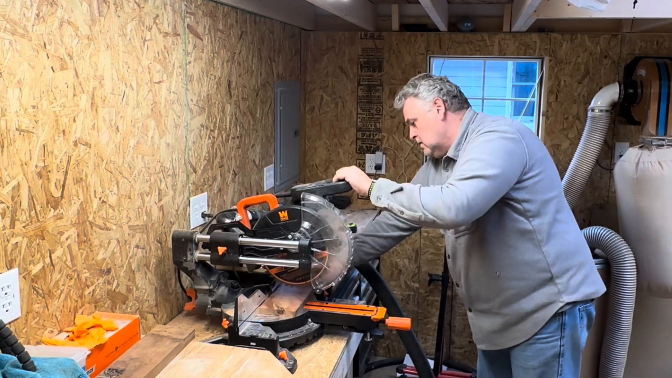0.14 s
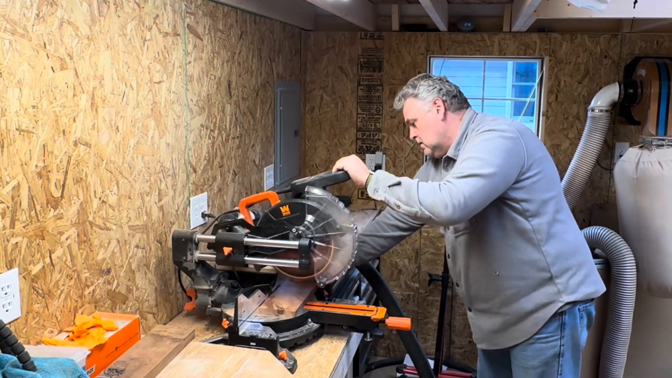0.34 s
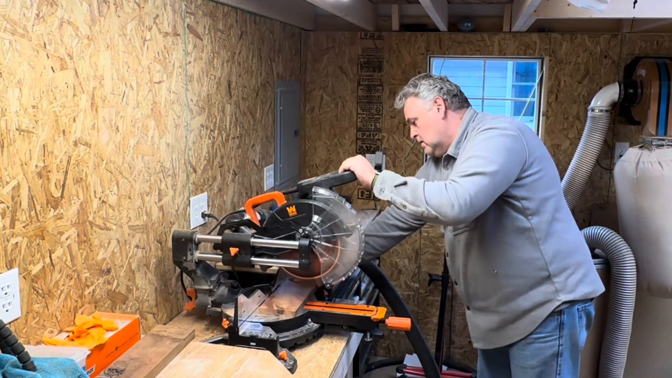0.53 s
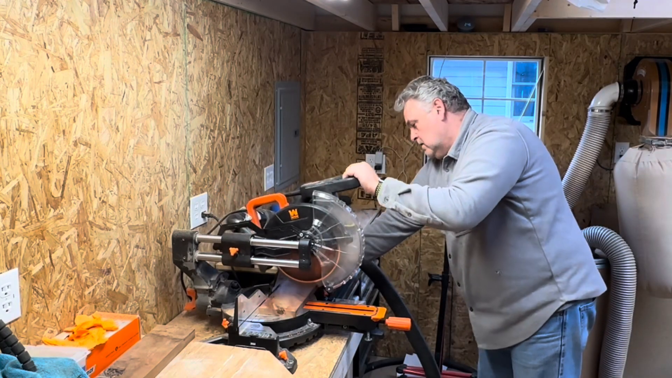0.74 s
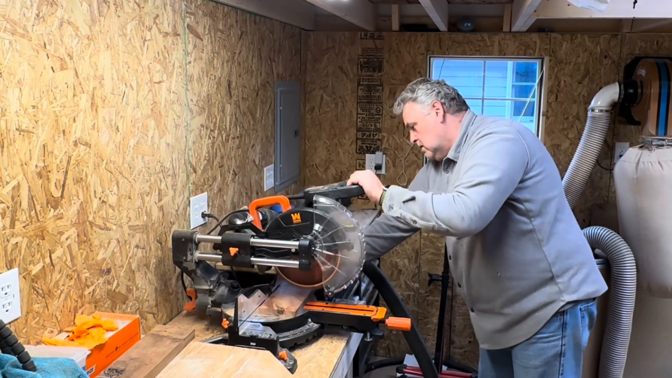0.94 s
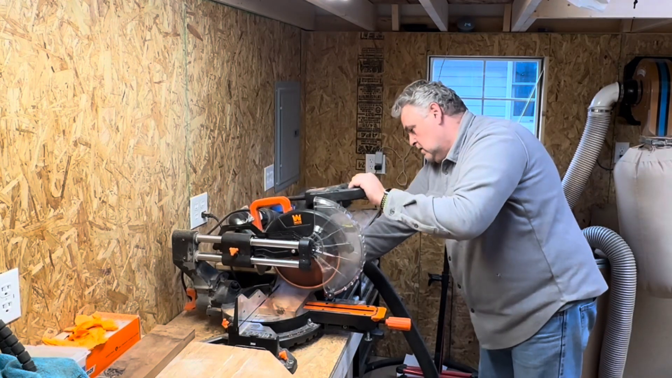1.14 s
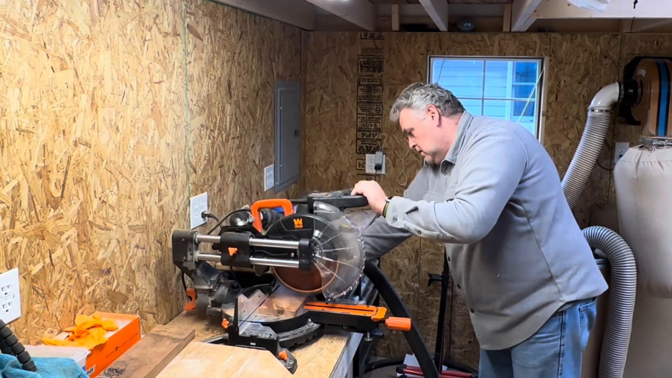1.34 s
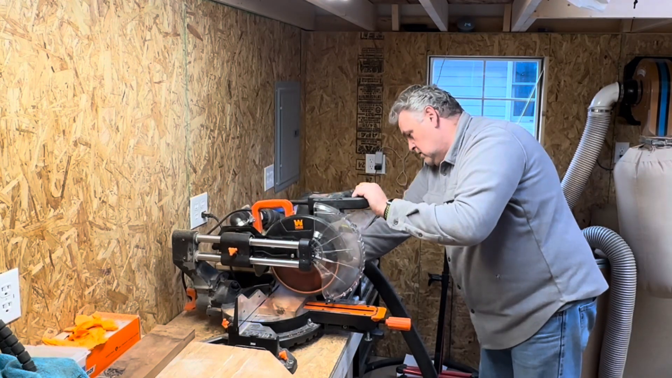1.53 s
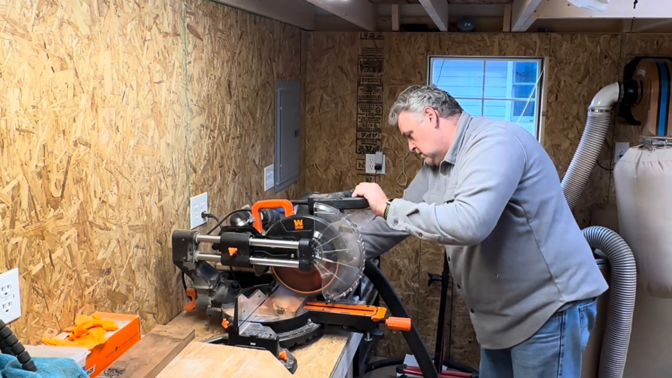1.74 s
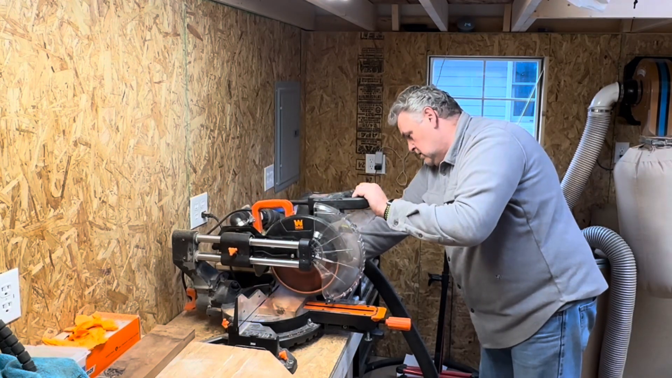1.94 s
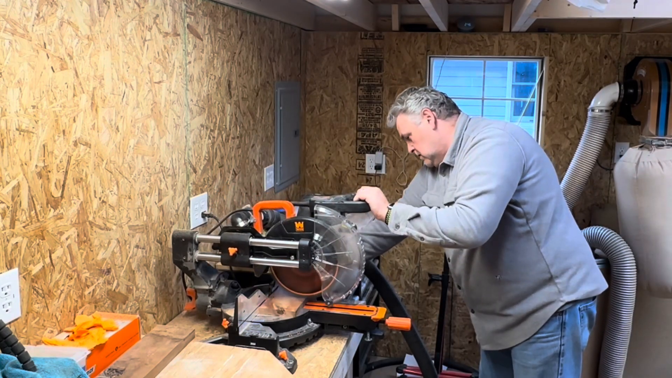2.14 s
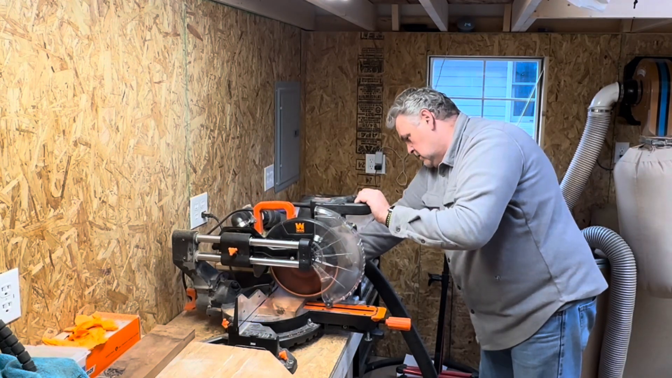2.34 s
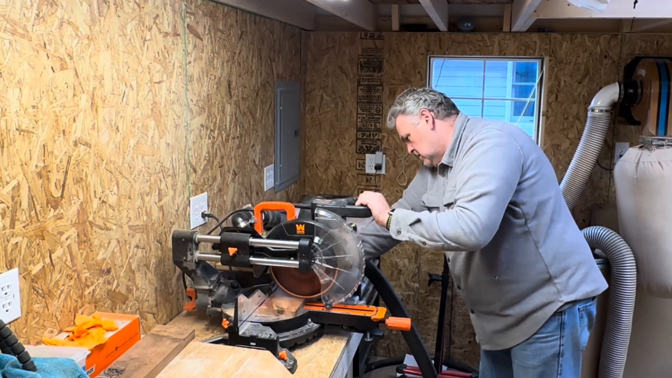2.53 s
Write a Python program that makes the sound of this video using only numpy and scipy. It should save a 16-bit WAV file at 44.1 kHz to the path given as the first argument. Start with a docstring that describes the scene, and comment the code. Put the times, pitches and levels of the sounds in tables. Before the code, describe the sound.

A miter saw in a small wooden workshop: switch tick, brief gearbox shudder, fast rising whine and harsh loud roar of cutting, then the roar drops and the blade rings while coasting; close, slightly overloaded microphone.

```python
"""In a small wooden workshop a miter saw starts: the switch clicks, the gearbox shudders, the motor climbs to speed.
Gear teeth and armature slots whine as sines at multiples of the shaft speed, over a roar of air, brushes
and cut wood made of noise shaped in bands. Then the roar falls away and the blade rings, as noise-driven
resonances, while the saw coasts. Mains hum swells at the start, and low hum and hiss fill the room.
The input overloads softly at the loudest moments."""
import sys
import numpy as np
from scipy import signal
from scipy.io import wavfile
from scipy.ndimage import uniform_filter1d

SR = 44100
rng = np.random.default_rng(int(sys.argv[2]) if len(sys.argv) > 2 else 0)


def bounce(signal):
    """Save signal as a 16-bit WAV file at the path given by the first command-line argument."""
    frames = np.transpose(np.atleast_2d(signal))
    limited = np.clip(frames, -1, 1)
    pcm = np.round(limited * 32767).astype(np.int16)
    wavfile.write(sys.argv[1], SR, pcm)


N = 116865
T = np.arange(N) / SR


def amp(db):
    """Decibel law: level in dB to amplitude gain."""
    return 10 ** (np.asarray(db) / 20)


def evened(x):
    """Normalization: scales a signal to rms 1."""
    return x / np.sqrt(np.mean(x ** 2) + 1e-20)


def follow(points):
    """Linear interpolation of (time, value) points over the whole scene."""
    return np.interp(T, *np.transpose(points))


def read_spectrum(points, hz):
    """Interpolation of a spectrum along a log-frequency axis."""
    point_hz, value = np.transpose(points)
    return np.interp(np.log(hz + 1), np.log(point_hz + 1), value)


def drift(smooth_s):
    """Low-pass filtered randomness: white noise averaged twice wanders slowly, at rms 1."""
    size = max(int(smooth_s * SR), 2)
    once = uniform_filter1d(rng.standard_normal(N), size)
    return evened(uniform_filter1d(once, size))


def resonate(x, hz, width_hz):
    """Two-pole resonance, of gain 1 at its peak."""
    return signal.lfilter(*signal.iirpeak(hz, hz / max(width_hz, 1), SR), x)


def ring(hz, width_hz):
    """Random excitation of a mode: noise through the same resonance twice, at rms 1."""
    once = resonate(rng.standard_normal(N), hz, width_hz)
    return evened(resonate(once, hz, width_hz))


def noise(shape_db, patchy_db):
    """Spectral shaping: random short-time spectra follow shape_db(hz, t), with drifting patches."""
    frames, hz = N // 256 + 5, np.fft.rfftfreq(1024, 1 / SR)
    real, imaginary, patches = rng.standard_normal((frames, 513, 3)).T
    for axis in (0, 1):
        patches = uniform_filter1d(patches, size=10, axis=axis)
    frame_s = np.arange(frames) * 256 / SR
    gain = amp(shape_db(hz, frame_s) + patchy_db * evened(patches))
    return signal.istft((real + 1j * imaginary) * gain, nperseg=1024, noverlap=768)[1][:N]


WAVER_DB, HALO_S = 2.2, .002  # rms level waver; smoothing time of the halo noise


def tone(phase, rough):
    """Random modulation: a wavering sine crossfades into a narrow halo of noise as rough goes 0 to 1."""
    rough = np.clip(rough, 0, 1)
    halo = drift(HALO_S) * np.sin(phase) + drift(HALO_S) * np.cos(phase)
    sine = np.sqrt(2) * amp(WAVER_DB * drift(0.007)) * np.sin(phase)
    return (1 - rough) * sine + rough * halo


# Shaft speed. Columns: time_s, speed_turns_per_s
SPEED = [(.195, 60), (.25, 135), (.29, 165), (.344, 195), (.4, 227), (.46, 254), (.558, 286), (.63, 302),
         (.708, 315), (.788, 326), (.884, 335.3), (.96, 341), (1.158, 352), (1.3, 361), (1.6, 373.3),
         (1.87, 381), (2.1, 384.6), (2.2, 383.3), (2.31, 381.6), (2.41, 378.3), (2.53, 373.3), (2.65, 369)]
# Whine levels. Columns: time_s, gear_db, slot_db, slot_octave_db
WHINE = [(.24, -50, -35, -60), (0.291, -55, -11, -48), (.325, -30, -23, -42), (.35, -19.5, -52, -43),
         (.4, -14, -16.5, -34), (.46, -11, -26, -20), (.52, -19, -20, -17.5), (.58, -15.5, -32, -38),
         (.7, -7, -16, -36), (.77, -13.5, -15, -19), (.884, -17.5, -19, -20), (.96, -20, -17, -18),
         (1.05, -34, -27, -26), (1.158, -17, -24, -20.5), (1.3, -39, -22, -22), (1.4, -25, -36, -35),
         (1.6, -26.5, -23.5, -33), (1.87, -38, -16.5, -29), (2.08, -48, -24, -29),
         (2.15, -42.5, -26.5, -57), (2.41, -38.5, -28, -60), (2.65, -61, -47, -60)]
# The slot whine clears as speed settles. Columns: time_s, roughness (0-1)
SLOT_ROUGH = [(.5, .8), (.75, .3), (1.6, .15)]
GEAR, SLOTS = 7, 12  # tones per shaft turn
WOBBLE, GEAR_ROUGH = .001, .2  # rms fraction of speed; roughness 0-1
START_S, WHINE_RISE_S = .195, 0.026


def whine():
    """Rotational orders: gear teeth and armature slots sound at multiples of the shaft speed."""
    s, gear_db, slot_db, octave_db = np.transpose(WHINE)
    turns = follow(SPEED)
    phase = 2 * np.pi * np.cumsum(turns * (1 + WOBBLE * drift(0.007))) / SR
    slot_rough = follow(SLOT_ROUGH)
    voices = [(GEAR, gear_db, GEAR_ROUGH), (SLOTS, slot_db, slot_rough), (2 * SLOTS, octave_db, slot_rough)]
    strong = sum(amp(np.interp(T, s, db)) * tone(order * phase, rough) for order, db, rough in voices)
    return (strong + weak_whines(turns, phase)) * np.clip((T - START_S) / WHINE_RISE_S, 0, 1) ** 2


# Multiples of the shaft speed that sound only weakly. Columns: order
WEAK_ORDERS = [3, 6, 14, 19, 21, 28]
# One voice per weak order, level before load and casing gain. Columns: level_db, roughness (0-1)
WEAK_VOICES = [(-25, 0.1), (-24, 0.23), (-23, 0.64), (-21.5, 0.8), (-21, 0.72), (-26, 1)]
# Resonances of the casing. Columns: pitch_hz, width_hz, gain_db
CASING = [(1170, 160, -12), (2110, 770, -3), (4280, 700, 10), (5800, 500, 3.5), (8200, 2100, -5)]


def weak_whines(turns, phase):
    """Resonant amplification: weak shaft orders are heard where they cross casing resonances."""
    roar_s, *roar_levels = np.transpose(ROAR)
    load_db = np.interp(T, roar_s, roar_levels[3] + 15)  # follows the mid band of the roar
    out = np.zeros(N)
    for order, (level_db, rough) in zip(WEAK_ORDERS, WEAK_VOICES):
        casing_gain = sum(amp(gain_db) / (1 + (2 * (order * turns - hz) / width_hz) ** 2)
                          for hz, width_hz, gain_db in CASING)
        level = amp(level_db + load_db + 2.36 * drift(0.12))
        out += casing_gain * level * tone(order * phase, rough)
    return out


# Roar level in each band, before the trim.
# Columns: time_s, bass_db, low_db, low_mid_db, mid_db, high_mid_db, treble_db
ROAR = [(.19, -50, -42, -36, -39.5, -37.5, -37), (.235, -46, -36, -33, -29.5, -33.5, -36),
        (.27, -46, -33, -27, -27.5, -24.5, -31), (.3, -49, -30, -28, -22.5, -19.5, -27),
        (.33, -44, -27, -26, -18, -21, -25), (.41, -46, -27, -24, -17, -16, -19),
        (.55, -45, -22, -24, -15, -13, -16), (.66, -40, -26, -27, -16, -13.5, -16),
        (.71, -29.5, -28, -25, -15.5, -13.5, -16), (.76, -40, -26, -26, -15, -13, -15),
        (.88, -36, -22, -26, -15.5, -11.5, -13), (1.08, -38.5, -23, -25, -16.5, -11, -13),
        (1.31, -39.5, -26, -25, -13.5, -10.5, -13), (1.56, -43, -28, -25, -16.5, -11, -13),
        (1.65, -47, -28, -27, -20, -14.5, -14), (1.76, -46, -34, -29, -22, -15.5, -14),
        (1.9, -47, -35, -37, -27, -17, -15), (2.05, -56, -38, -39, -28, -20, -19),
        (2.13, -43, -39, -41, -30, -21, -22), (2.18, -46, -40, -43, -38, -25, -24),
        (2.32, -52, -40, -43, -30, -28.5, -27), (2.38, -51, -38, -43, -36, -28.5, -30),
        (2.5, -55, -39, -44, -33, -31.5, -31), (2.65, -53, -37, -44, -31, -28.5, -32)]
# Edges of those bands. Columns: edge_hz
BANDS_HZ = [30, 300, 1200, 1800, 3200, 7000, 16000]
# Relative spectrum within the bands under power. Columns: pitch_hz, density_db (per Hz)
ROAR_TONE = [(18, -39), (30, -21), (116, -12), (181, -17), (241, -33), (366, -21.5), (428, -9), (475, -2),
             (555, -14.5), (702, -6), (779, -15), (843, -3.5), (1010, -11.5), (1380, -0.5), (1790, -3),
             (2150, -2), (3180, -5.5), (4350, 2.5), (5500, -4), (5950, -1.5), (7520, -4), (8350, 0),
             (9260, -8), (13700, -4.5), (15200, -15)][:-1] + [(14800, -1.5), (15600, -19)]
# Relative spectrum within the bands while coasting. Columns: pitch_hz, density_db (per Hz)
COAST_TONE = [(18, -57), (30, -17.5), (59, -18.5), (159, -26), (406, -31), (439, -12.5), (514, -30),
              (702, -30), (759, -15.5), (935, -28), (1120, -15.5), (1310, -20), (1700, -17.5),
              (1940, -13.5), (2390, -19), (2580, -3.5), (2940, -19.5), (4020, -15.5), (4470, -6.5),
              (5650, -18), (7520, -15), (8130, -14), (10300, -19), (13000, -14),
              (15200, -21.5)][:-1] + [(14500, -12), (15600, -28)]
EASE_S, COAST_S = 1.57, 2.12  # the spectrum eases from power to coasting between these times
ROAR_TRIM_DB = -0.5


def roar():
    """Broadband turbulence and friction: air, brushes and cut wood, each band at its own level."""
    s, *levels = np.transpose(ROAR)

    def shape_db(hz, t):
        band = np.clip(np.digitize(hz, BANDS_HZ) - 1, 0, len(levels) - 1)

        def within_bands(points):
            density_db = read_spectrum(points, hz)
            band_power = np.bincount(band, amp(2 * density_db))
            return density_db - 10 * np.log10(band_power)[band]  # each band sums to 0 dB

        ease = np.clip((t - EASE_S) / (COAST_S - EASE_S), 0, 1)
        tilt = np.outer(within_bands(ROAR_TONE), 1 - ease) + np.outer(within_bands(COAST_TONE), ease)
        level = np.array([np.interp(t, s, db) for db in levels])
        return tilt + uniform_filter1d(level[band], size=5, axis=0)

    flat = noise(lambda hz, t: 0 * hz[:, None], patchy_db=1)
    scale = np.sqrt(512) / np.std(flat)  # brings summed bin power to signal power
    drone = housing_drone()
    rush = scale * amp(ROAR_TRIM_DB) * noise(shape_db, patchy_db=1.64)
    return (rush + drone) * np.clip((T - s[0]) / 0.0048, 0, 1)


# Resonances of the housing, level over the low roar. Columns: pitch_hz, width_hz, level_db
HOUSING = [(447.2, 19, -18.5), (489, 8.3, -21), (744.4, 10, -13.5), (859, 16.7, -12), (1355, 27, -16.5)]
DRONE_END_S, DRONE_FADE_DB_PER_S = 1.7, 26  # extra fade from this time on


def housing_drone():
    """Forced resonance: the housing drones along with the low band of the roar."""
    s, _, low_db, *_ = np.transpose(ROAR)
    fade_db = DRONE_FADE_DB_PER_S * np.maximum(T - DRONE_END_S, 0)
    level = amp(np.interp(T, s, low_db) + 3.2 * drift(0.095) - fade_db)
    return level * sum(amp(db) * ring(hz, width_hz) for hz, width_hz, db in HOUSING)


# Modes of the blade, level before the rub. Columns: pitch_hz, width_hz, level_db
BLADE = [(2553, 100, -39.5), (4374, 9.5, -40), (5300, 150, -55), (7200, 230, -51)]
BLADE_FROM_S = 1.85
RUB_S, RUB_LENGTH_S, RUB_DB = 2.32, 0.099, 15.5  # the blade brushes wood and rings louder


def blade():
    """Modal vibration: the steel disc rings at its own modes, driven by noise."""
    rubbing = 1. * ((T > RUB_S) & (T < RUB_S + RUB_LENGTH_S))
    rub_db = RUB_DB * uniform_filter1d(rubbing, size=600)
    lowest, *upper = [amp(db) * ring(hz, width_hz) for hz, width_hz, db in BLADE]
    # the rub lifts all but the lowest mode
    return (lowest + amp(rub_db) * sum(upper)) * np.clip((T - BLADE_FROM_S) / 0.2, 0, 1)


# Shudders, length between half-level points. Columns: start_s, length_s, level_db
SHUDDERS = [(0.195, 0.0129, -13), (.211, 0.0088, -6), (0.22, 0.013, -17), (.237, 0.0153, -15.5),
            (0.252, 0.014, -13), (0.264, 0.0163, -17), (0.288, 0.0046, -22)]
# Partials of each shudder, relative to its level. Columns: pitch_hz, level_db
GEARBOX = [(791.6, 2), (726, -8.5), (1590, -22), (2186, -15)]
SHUDDER_EDGE_S = 0.0021  # rise and fall time


def gearbox_shudder():
    """Gated oscillation: the gearbox shudders in short hums as the gears take up."""
    out = np.zeros(N)
    for start_s, length_s, level_db in SHUDDERS:
        end_s = start_s + length_s + SHUDDER_EDGE_S
        gate = np.clip(np.minimum(T - start_s, end_s - T) / SHUDDER_EDGE_S, 0, 1)
        partials = sum(amp(db) * np.sin(2 * np.pi * hz * (T - start_s)) for hz, db in GEARBOX)
        out += amp(level_db) * gate * partials
    return out


SWITCH_S, SWITCH_HZ, SWITCH_DB, SWITCH_T60 = .183, 14700, -26, 0.028  # T60: seconds to fall 60 dB


def switch_tick():
    """Exponential decay: the switch ticks as a high noise band that dies away."""
    after = np.maximum(T - SWITCH_S, 0)
    return ring(SWITCH_HZ, 3000) * amp(SWITCH_DB - 60 * after / SWITCH_T60) * (T > SWITCH_S)


# Mains harmonics at the peak of the swell. Columns: pitch_hz, level_db
MAINS_HUM = [(120, -36.5), (240, -38.5), (360, -30.5)]
HUM_PEAK_S, HUM_WIDTH_S = 0.314, 0.055


def hum():
    """Magnetic forcing: the windings hum at mains harmonics while the starting current is high."""
    swell = np.exp(-((T - HUM_PEAK_S) / HUM_WIDTH_S) ** 2) * (T > START_S)
    return swell * sum(amp(db) * np.sin(2 * np.pi * hz * T) for hz, db in MAINS_HUM)


# Relative spectrum of the room noise. Columns: pitch_hz, density_db (per Hz)
ROOM_TONE = [(18, -66), (30, -47), (307, -17), (350, -11.5), (399, -41), (518, -9), (673, -13.5),
             (1080, -18.5), (1160, -22), (2020, -38), (3310, -26), (7450, -41), (15500, -51)]
ROOM_DB = -42  # rms level


def room():
    """Stationary background noise: the low hum and hiss of the workshop."""
    return amp(ROOM_DB) * evened(noise(lambda hz, t: read_spectrum(ROOM_TONE, hz)[:, None], patchy_db=-1.5))


def scene():
    """Superposition: all sources add, the same in both channels."""
    mix = whine() + roar() + blade() + gearbox_shudder() + switch_tick() + hum() + room()
    return np.tile(mix, (2, 1))


KNEE, HEADROOM, EDGE_HZ = .7, .26, 15670  # amplitude, amplitude above the knee, low-pass edge


def record(dry):
    """Saturation and band limiting: a soft knee into overload, a low-pass, then full-scale clipping."""
    over = np.maximum(abs(dry) - KNEE, 0)
    bent = np.sign(dry) * (np.minimum(abs(dry), KNEE) + HEADROOM * np.tanh(over / HEADROOM))
    taps = signal.firwin(511, EDGE_HZ, window=("kaiser", 9), fs=SR)[None]
    return np.clip(signal.oaconvolve(bent, taps, "same"), -1, 1)


dry = scene()
out = record(dry)
bounce(out)
```